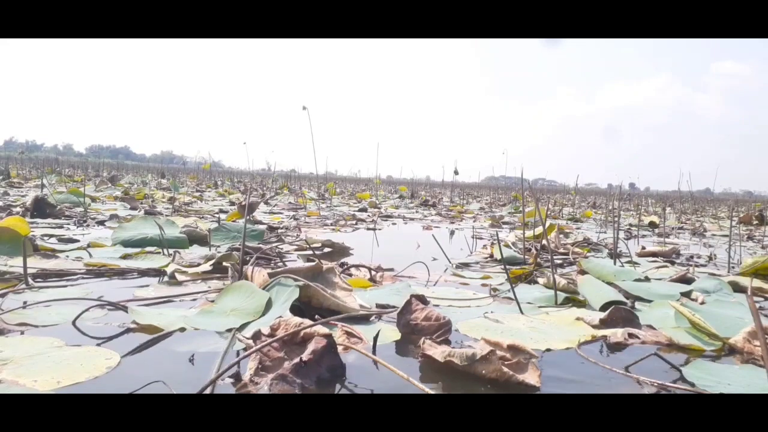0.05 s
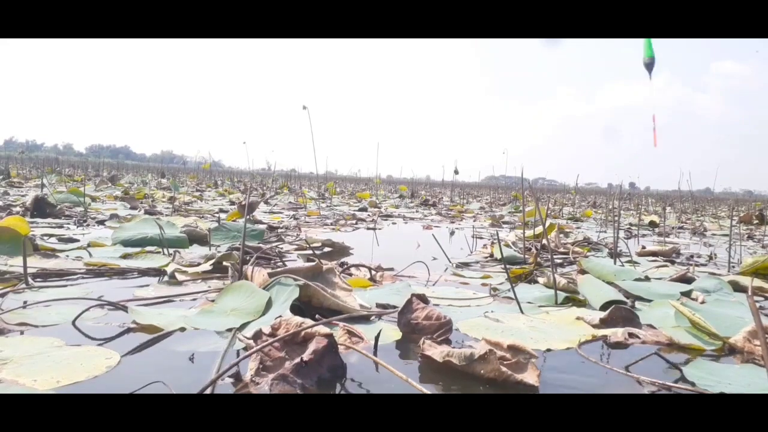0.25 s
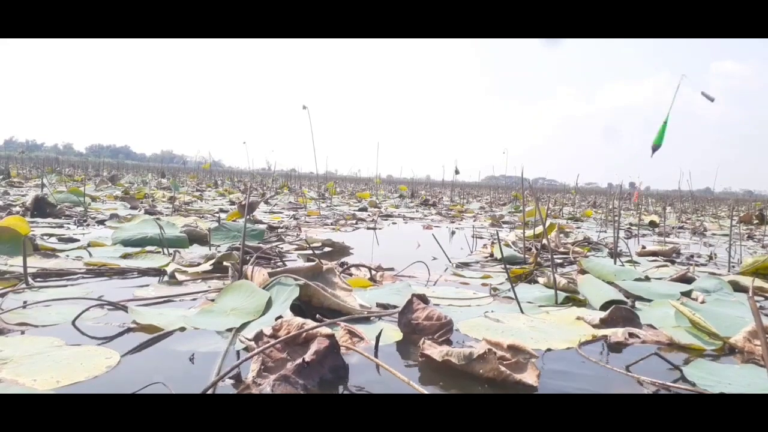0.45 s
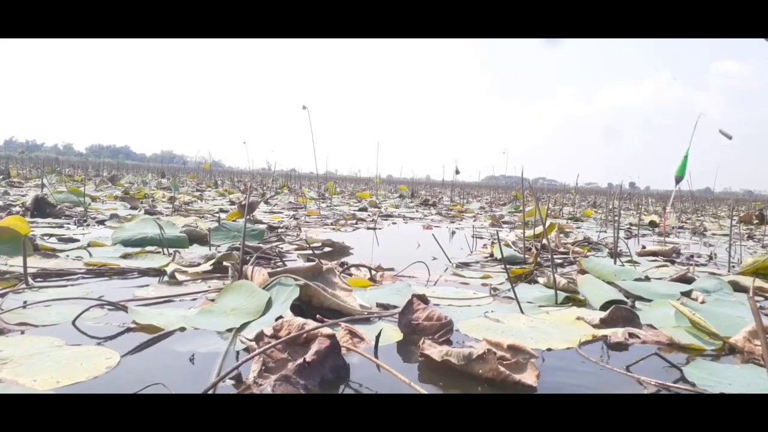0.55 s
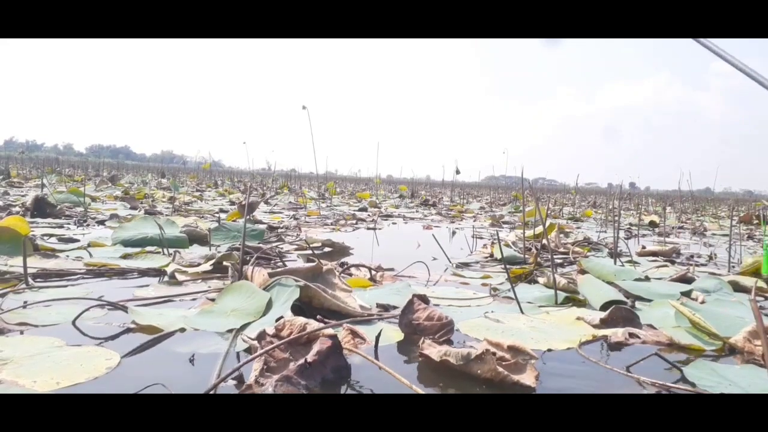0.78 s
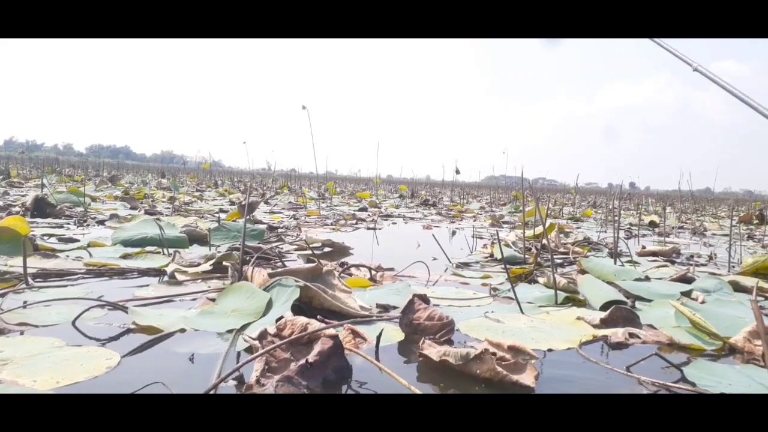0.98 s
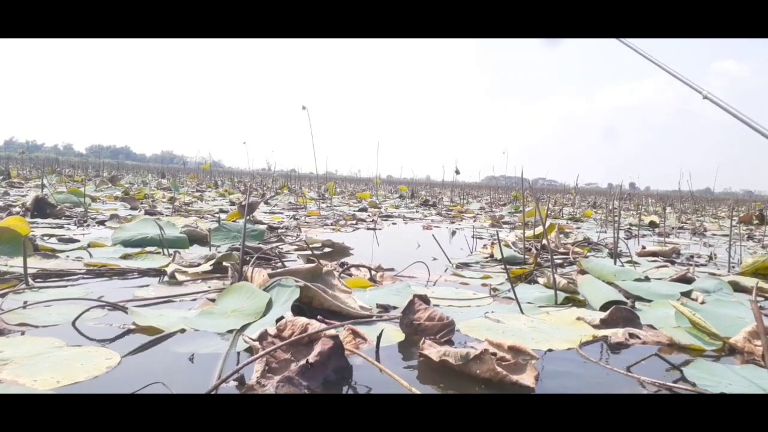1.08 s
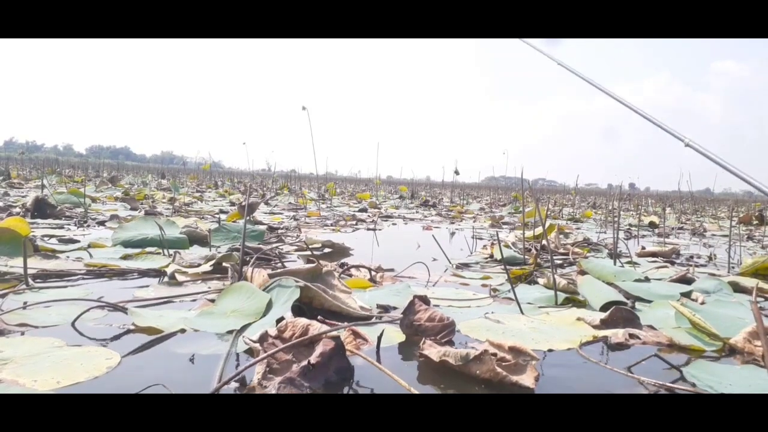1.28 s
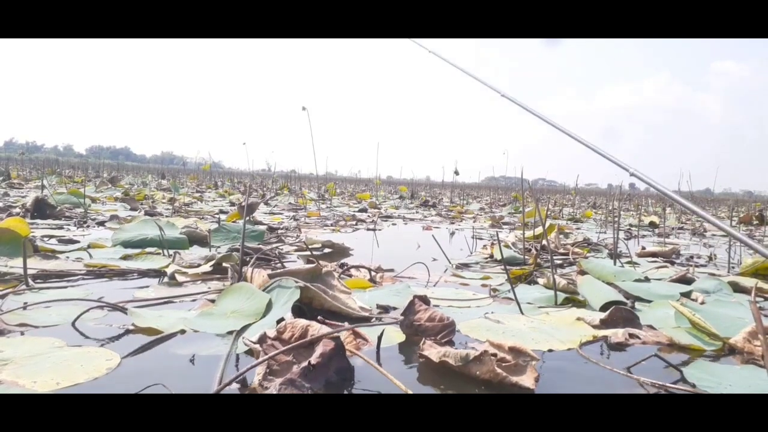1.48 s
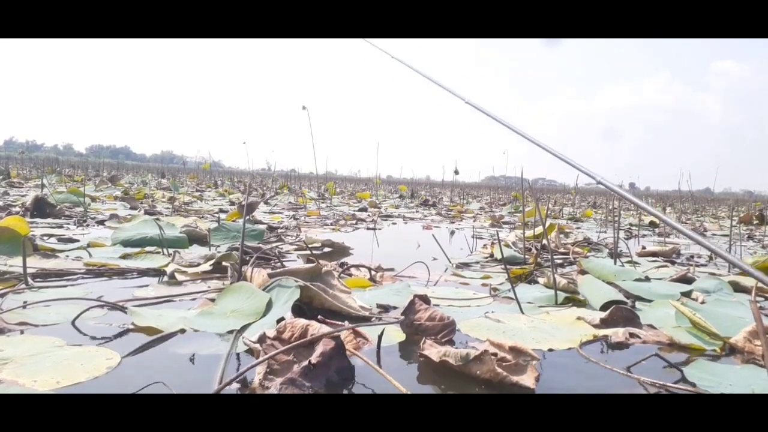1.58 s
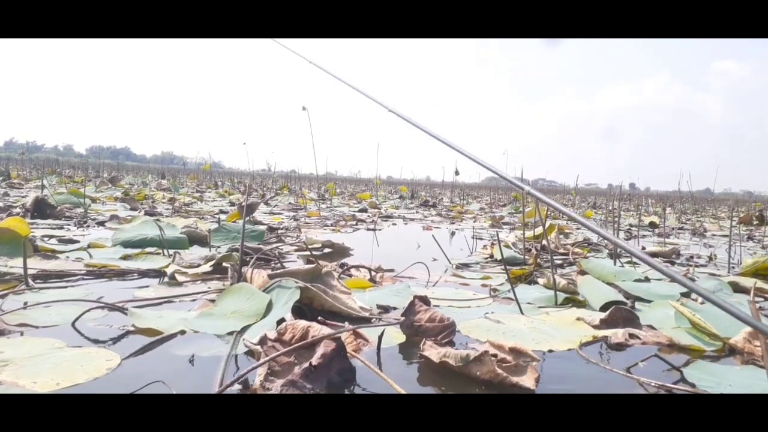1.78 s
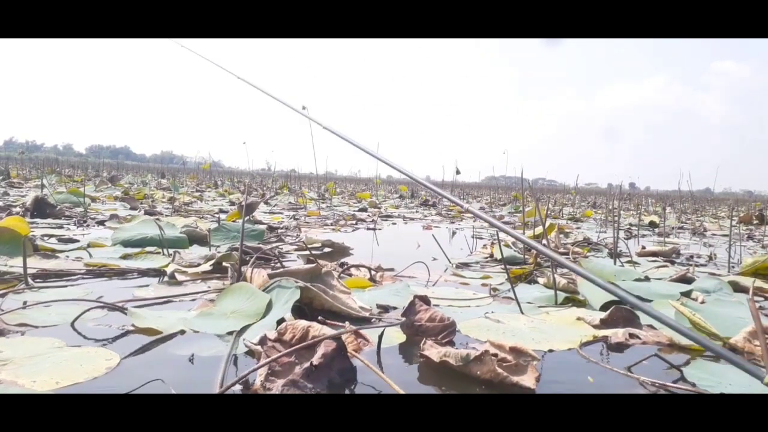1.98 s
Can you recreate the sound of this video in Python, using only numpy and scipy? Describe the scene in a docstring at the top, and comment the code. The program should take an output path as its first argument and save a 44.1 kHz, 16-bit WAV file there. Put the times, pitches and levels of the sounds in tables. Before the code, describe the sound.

A fishing rig splashes lightly onto water and leaves, with gusty wind on the microphone.

```python
"""At a lotus-covered reservoir, someone swings a fishing rig out over the water.
The line swishes through the air, sinker and float slap down on leaves and water, and drops patter
after them. The rod rubs and bumps in the hand, then slides out with a short rustle.
Wind buffets the two microphone openings; the camera adds a thin whine on the left."""
import sys
import numpy as np
from scipy import signal
from scipy.fft import rfft, irfft
from scipy.io import wavfile
from scipy.ndimage import uniform_filter1d

SR = 44100
rng = np.random.default_rng(int(sys.argv[2]) if len(sys.argv) > 2 else 0)


def wav_record(signal):
    """Record a signal, one row per channel, as 16-bit PCM in the file named by sys.argv[1]."""
    frames = np.transpose(np.atleast_2d(signal))
    bounded = np.clip(frames, -1, 1)
    # unit amplitude maps onto the largest positive 16-bit level
    quanta = np.round(bounded * 32767).astype(np.int16)
    wavfile.write(sys.argv[1], SR, quanta)


N = 90404
TOP_HZ = 15900


def gain(db):
    """Turn decibels into a number to multiply by."""
    return 10 ** (np.asarray(db) / 20)


def curve(rows):
    """Join (time, value) points with straight lines."""
    return np.interp(np.arange(N) / SR, *np.array(rows).T)


def pan(db):
    """Left and right gains; above 0 dB leans left, below leans right."""
    return gain(np.array([db, -db]).reshape(2, -1) / 2)


def wobble(hz):
    """A smooth random wobble, about 1 in size; more hz makes it quicker."""
    width = max(int(SR / hz), 2)
    smooth = uniform_filter1d(rng.standard_normal(N), width, mode="wrap")
    smooth = uniform_filter1d(smooth, width, mode="wrap")
    return smooth / smooth.std()


def noise(colour, likeness, grain_db=0):
    """Stereo noise of strength 1, shaped by a colour table; likeness 1 makes both sides the same."""
    white = rng.standard_normal((3, N))
    white = np.sqrt(likeness) * white[2] + np.sqrt(1 - likeness) * white[:2]
    white *= gain(grain_db * wobble(980))  # fast level changes sound grainy
    hz = np.maximum(np.arange(N // 2 + 1) * SR / N, 1)
    colour_hz, colour_db = np.array(colour).T
    shape = gain(np.interp(np.log(hz), np.log(colour_hz), colour_db))
    shaped = irfft(rfft(white) * shape, N)
    return shaped / shaped.std()


# Colour of the open air, its mix of low and high sound: f/Hz, level/dB
AIR_COLOUR = [(300,5),(480,2),(800,-13),(1500,-47),(7400,-44),(11000,-27.5),(12300,-11),(13300,-25),(16000,-34)]

def open_air(t):
    """A soft outdoor hush that slowly fades."""
    level_db = -42.5 - 5.5 * t + wobble(hz=29)
    return noise(AIR_COLOUR, likeness=0.66) * gain(level_db) * pan(db=-4)


def camera_whine():
    """The camera gives off one very high, slightly wavering tone, almost all on the left."""
    pitch_hz = 12095 + 2 * wobble(hz=33)
    tone = np.sin(2 * np.pi * np.cumsum(pitch_hz) / SR)
    return tone * gain(-40 + wobble(hz=11.4)) * gain([[0], [-58]])


# Colour of the wind's low rumble: f/Hz, level/dB
WIND_COLOUR = [(20,-15),(36,-25),(55,3),(90,0),(135,-3.5),(190,-13.5),(270,-24),(420,-41),(900,-69)]
# Gusts at the left and right microphone openings: t/s, level/dB
LEFT_GUSTS = [(0,-37),(.21,-52),(.255,-29),(.31,-35),(.5,-31.5),(.565,-15),(.69,-39.5),(.86,-22.5),(.93,-40),(1.36,-35.5),(1.47,-22.5),(1.56,-42),(1.63,-32.5),(1.82,-39.5),(1.9,-53.5),(2.05,-40)]
RIGHT_GUSTS = [(0,-33.5),(.23,-30.5),(.285,-17.5),(.35,-31.5),(.49,-32.5),(.61,-15.5),(.7,-30),(.93,-29.5),(1.02,-21),(1.11,-20),(1.19,-24),(1.245,-14.5),(1.32,-27.5),(1.4,-20.5),(1.44,-28.5),(1.53,-17),(1.57,-37),(1.63,-34),(1.66,-16),(1.7,-38.5),(1.77,-25),(1.83,-39.5),(1.98,-43.5),(2.03,-35)]

def wind():
    """Swirls of air buffet each opening on its own; the gusts set how loudly."""
    swirls = noise(WIND_COLOUR, likeness=0.15)
    power = uniform_filter1d(uniform_filter1d(swirls ** 2, size=1000), size=1000)
    even_rumble = swirls / np.sqrt(power)
    gust_db = np.array([curve(LEFT_GUSTS), curve(RIGHT_GUSTS)])
    return even_rumble * gain(gust_db + 1.3 * wobble(hz=30))


# Colour of the line cutting the air: f/Hz, level/dB
SWISH_COLOUR = [(1500,3.5),(3200,0.5),(5000,-5.5),(7400,-8.5),(10500,-5),(13000,-44),(16000,-34)]
# Strength of the swing: t/s, level/dB
SWING_LEVEL = [(.05,-59),(.32,-44.5),(.57,-51.5),(.68,-59)]

def line_swish():
    """The hiss of the swinging line swells and dies down before the rig lands."""
    hiss = noise(SWISH_COLOUR, likeness=0.057, grain_db=3)
    return hiss * gain(curve(SWING_LEVEL)) * pan(db=-4.5)


# Colour of the rod's rustle: f/Hz, level/dB
RUSTLE_COLOUR = [(200,-2),(450,7),(900,3),(2200,-3),(2560,0),(3100,-5),(4700,-6),(6300,-11),(9000,-9),(12400,-10),(16000,-19.5)]
# Strength of the slide: t/s, level/dB
SLIDE_LEVEL = [(1.58,-75),(1.605,-49),(1.664,-47),(1.671,-32),(1.69,-34),(1.76,-36),(1.824,-36.5),(1.84,-48),(1.92,-55),(2.05,-56)]

def rod_slide():
    """The rod slides out: a gritty rush that starts with a jerk and goes on as a faint scrape."""
    rush = noise(RUSTLE_COLOUR, likeness=0.33, grain_db=2.8)
    crackle_db = 3.5 * wobble(hz=92)
    return rush * gain(curve(SLIDE_LEVEL) + crackle_db)


# Colour of the hand rubbing the rod: f/Hz, level/dB
GRIP_COLOUR = [(200,-13),(450,0),(950,2.5),(1250,-1),(1700,-8),(2400,-18.5),(4500,-23),(7000,-29),(11000,-29),(16000,-34)]
# Strength of the rubbing: t/s, level/dB
GRIP_LEVEL = [(0,-43),(.15,-52.5),(.27,-38),(.33,-45),(.56,-44.5),(.68,-61),(.79,-41.5),(1.05,-41),(1.13,-41),(1.19,-53.5),(1.25,-45),(1.32,-43),(1.4,-38.5),(1.56,-38.5),(1.82,-41),(1.92,-47),(2.05,-52)]

def rod_rub():
    """The rod rubs unevenly in the hand."""
    friction = noise(GRIP_COLOUR, likeness=0.11, grain_db=2)
    return friction * gain(curve(GRIP_LEVEL) + 2.5 * wobble(hz=70)) * pan(db=-3.5)


# Taps of the rod: t/s, f/Hz, level/dB, rise time/s
ROD_TAPS = [(0.2425,1240,-29.5,.0007),(0.2723,1270,-29.5,0.0017),(1.254,980,-29.5,0.0014),(1.3627,980,-19,0.00075),(1.3653,1070,-22.5,0.00096),(1.3763,1040,-25,0.00081),(1.3798,1130,-20,0.0013),(1.5572,1040,-26,0.0011),(1.7472,950,-21.5,0.0012),(1.862,1140,-32,0.0025),(1.8934,1124,-28,0.0028)]

def rod_taps(t):
    """Where the rod catches in the grip, it gives a soft hollow tap with a little scuff."""
    out = np.zeros((2, N))
    scuff = gain(-23) * noise(RUSTLE_COLOUR, likeness=0)
    for start, hz, db, rise in ROD_TAPS:
        age = np.clip(t - start, 0, 0.1)
        swell = (age / rise * np.exp(1 - age / rise)) ** 2
        out += gain(db) * swell * (np.sin(2 * np.pi * hz * age) + scuff)
    return out * pan(db=-5.5)


# Colour of the fizz of falling drops: f/Hz, level/dB
FIZZ_COLOUR = [(250,6),(450,1),(800,6),(1700,0.5),(3000,-1.5),(6500,-13),(9000,-13.5),(12500,-5.5),(16000,-25)]

def falling_drops(t):
    """Fine drops patter back on the water: a fizz, and tiny bubbles that ring for a few cycles."""
    start_s, rise_s, end_s, fade_s = 0.773, 0.061, 0.899, 0.027
    drops_per_s, middle_hz, spread_octaves, ring_cycles = 500, 1500, 0.7, 2.5
    flow = np.clip((t - start_s) / rise_s, 0, 1) * np.exp(-np.maximum(t - end_s, 0) / fade_s)
    out = noise(FIZZ_COLOUR, likeness=0.15, grain_db=2) * gain(-35)
    age = t[t < 0.02]
    chance = rng.random(N)
    pitch, strength = rng.standard_normal((2, N))
    for i in np.flatnonzero(chance[:-len(age)] < drops_per_s / SR):
        cycles = age * min(middle_hz * 2 ** (spread_octaves * pitch[i]), TOP_HZ)
        bubble = np.sin(2 * np.pi * cycles) * np.exp(-cycles / ring_cycles)
        out[:, i:i + len(age)] += gain(-38) * strength[i] * bubble
    return out * flow * pan(db=-3.5)


def ring(tones, age, pitch):
    """The fading tones of something struck; every second one is flipped upside down."""
    out = 0
    for k, (hz, db, fade_s) in enumerate(tones):
        fade = np.exp(-np.log(1000) * age / fade_s)
        out += (-1) ** k * gain(db) * np.sin(2 * np.pi * hz * pitch * age) * fade
    return out


# Tones of a slap's hollow knock and sharp snap: f/Hz, level/dB, time to fade by 60 dB/s
KNOCK_TONES = [(473,-12,0.048),(802,-6,0.03),(1085,-6.5,0.0095),(1742,-7,0.017)]
SNAP_TONES = [(2040,-10.5,0.0045),(2670,-1.5,0.0074),(3170,-6,0.0082)]
# Colour of a slap's spray: f/Hz, level/dB
SPRAY_COLOUR = [(1500,5.5),(3800,3),(4700,5.5),(6000,-1),(7600,-3.5),(8900,3.5),(10900,-1),(13300,0.5),(16000,-13)]
# Hits on leaves, water and rod: t/s, knock/dB, snap/dB, spray/dB, pitch factor, left minus right/dB
TACKLE_HITS = [(0.7201,-28.5,-44,-43.5,1.06,-6),(0.7626,-16,-14.5,-23.5,0.967,-6.5),(0.7860,-17,-9.5,-21.5,1.05,-3.5),(0.8230,-23.5,-29,-35,1.36,2),(0.8301,-19.5,-12,-18.5,1.08,-6.5),
               (0.8697,-17.5,-30,-46,0.955,1),(0.8925,-44,-46,-26.5,1.7,-2),(0.8979,-23,-18.5,-22,0.992,-3),
               (1.0898,-33,-26.5,-35,0.754,-11),(1.472,-55,-17,-27.5,1.104,-4),(1.665,-20.5,-18.5,-35,1.35,-1),(1.8962,-48,-48,-35,1.1,-8)]

def tackle_slaps(t):
    """Each hit of the tackle makes a hollow knock and a sharp snap, and throws a puff of spray."""
    rise_s, fade_s, tail_s = 0.0001, 0.0011, 0.0089  # timing of the puff
    delay_s = np.array([[0], [0.00006]])  # the left side hears it first
    out = np.zeros((2, N))
    spray = noise(SPRAY_COLOUR, likeness=0.068)
    for start, knock_db, snap_db, spray_db, pitch, pan_db in TACKLE_HITS:
        sounding = (t > start) & (t < start + 0.08)
        age = np.maximum(t[sounding] - start - delay_s, 0)
        knock = gain(knock_db) * ring(KNOCK_TONES, age, pitch)
        snap = gain(snap_db) * ring(SNAP_TONES, age, pitch)
        fade = np.exp(-age / fade_s) + gain(-11) * np.exp(-age / tail_s)
        puff = gain(spray_db) * np.minimum(age / rise_s, 1) * fade * spray[:, sounding]
        out[:, sounding] += (knock + snap) * pan(pan_db) + puff
    return out


def scene():
    """Add up all the sounds, from the background to the slaps."""
    t = np.arange(N) / SR
    background = open_air(t) + camera_whine() + wind()
    rod = rod_slide() + rod_rub() + rod_taps(t)
    return background + line_swish() + rod + falling_drops(t) + tackle_slaps(t)


def record(dry):
    """The camera cuts away the very highest sounds."""
    low_pass = signal.ellip(12, 0.2, 90, TOP_HZ, fs=SR, output="sos")
    return signal.sosfilt(low_pass, dry)


dry = scene()
out = record(dry)
wav_record(out)
```